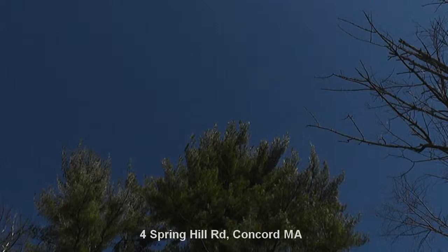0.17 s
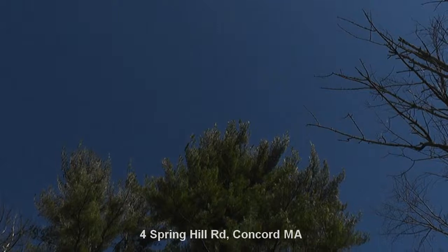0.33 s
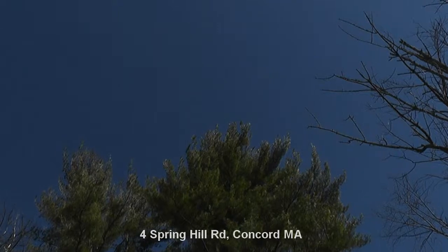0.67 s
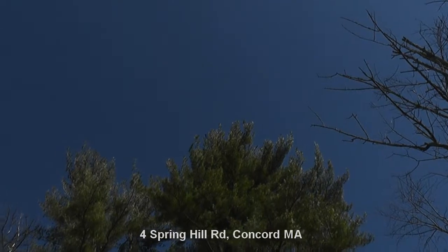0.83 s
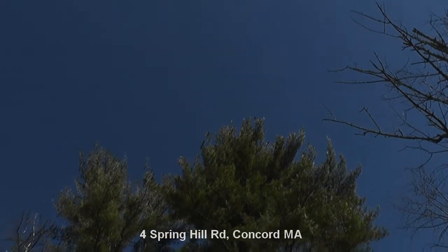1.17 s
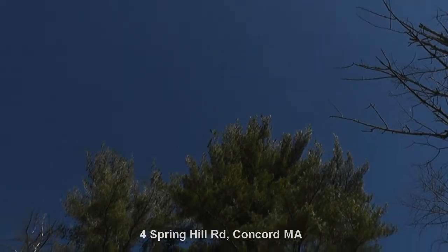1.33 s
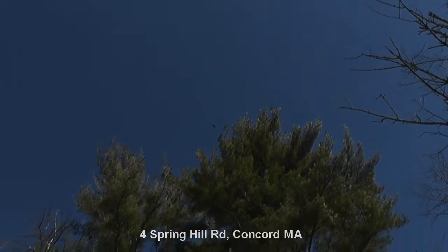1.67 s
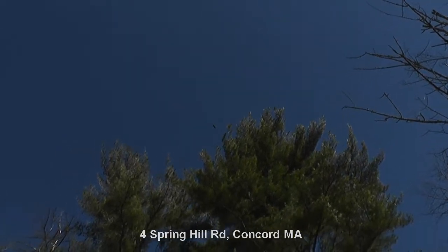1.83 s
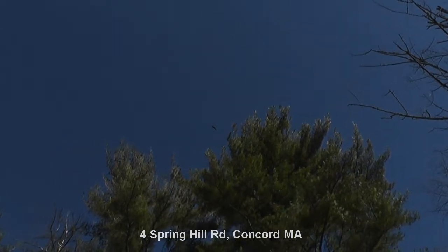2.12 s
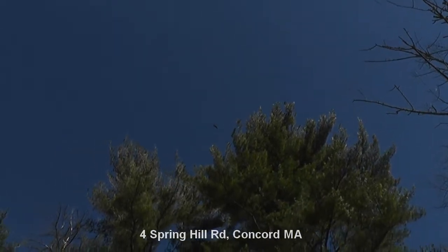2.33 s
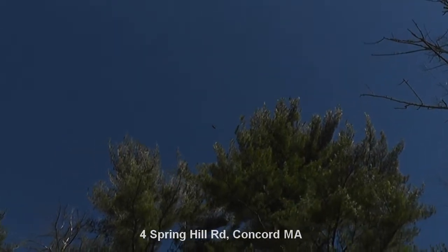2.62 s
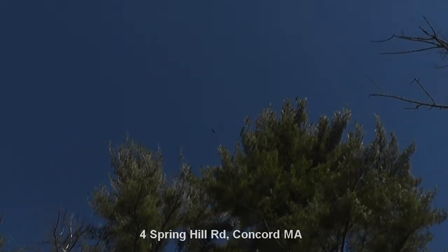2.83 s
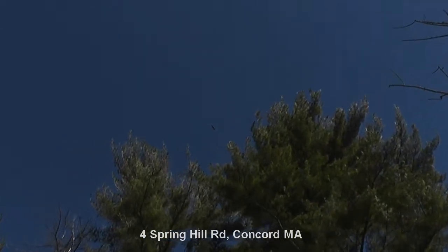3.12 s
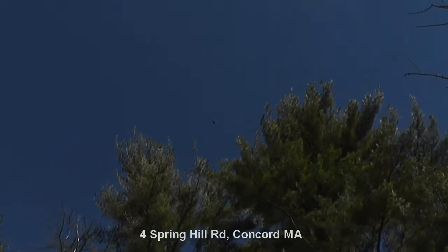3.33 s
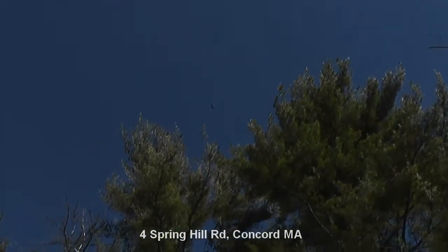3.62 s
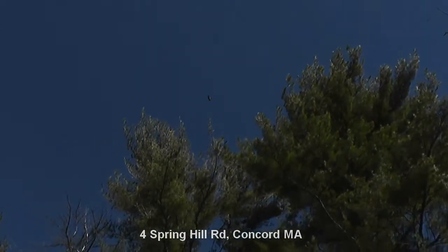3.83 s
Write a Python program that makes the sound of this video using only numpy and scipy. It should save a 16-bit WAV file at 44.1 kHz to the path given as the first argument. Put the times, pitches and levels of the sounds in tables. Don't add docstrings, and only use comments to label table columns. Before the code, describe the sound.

Hawk gives two descending screams that crack lower at the end, with birds chirping and traffic humming.

```python
import sys
import numpy as np
from scipy import signal
from scipy.fft import rfft, irfft, next_fast_len
from scipy.io import wavfile
from scipy.ndimage import uniform_filter1d

SR = 44100
rng = np.random.default_rng(int(sys.argv[2]) if len(sys.argv) > 2 else 0)


def master_out(mix):
    frames = np.transpose(np.atleast_2d(mix))
    ceiling = np.clip(frames, -1, 1)
    pcm = np.round(ceiling * 32767).astype(np.int16)
    wavfile.write(sys.argv[1], SR, pcm)


def volts_from_decibels(level):
    exponent = np.asarray(level, float) / 20
    return 10 ** exponent


N = 175959


def on_log(table, hz):
    a = np.array(table, float)
    return np.interp(np.log(np.maximum(hz, 1)), np.log(a[:, 0]), a[:, 1])


def over_time(times, values):
    return np.interp(np.arange(N) / SR, times, values)


def walk(rate_hz, size=N):
    hold = max(int(SR / rate_hz), 1)
    steps = np.repeat(rng.standard_normal(size // hold + 1), hold)
    return 0.86 * uniform_filter1d(uniform_filter1d(steps, hold), hold)[:size]


def track(rows, edge_s=0.0013):
    a = np.array(rows, float)
    t = np.arange(a[0, 0], a[-1, 0], 1 / SR)
    hz = uniform_filter1d(np.interp(t, a[:, 0], a[:, 1]), size=66, mode="nearest")
    ends = np.clip(np.minimum(t - t[0], t[-1] - t) / edge_s, 0, 1)
    return int(t[0] * SR), hz, np.sqrt(2) * ends * volts_from_decibels(np.interp(t, a[:, 0], a[:, 2]))


def running_phase(hz):
    return 2 * np.pi * np.cumsum(hz) / SR


def pan(x, db):
    return x * volts_from_decibels(np.array([[db / 2], [-db / 2]]))


WOOD_GAP_S, WOOD_WIDE = 0.0013, 0.35


def wood(x, t60_s, patchy_db):
    t = np.arange(SR) / SR
    tail = rng.standard_normal((2, SR)) * volts_from_decibels(3.9 * rng.standard_normal(SR))
    tail = tail * volts_from_decibels(-60 * t / t60_s + patchy_db * walk(44.3, size=SR))
    tail = tail * np.clip(t / WOOD_GAP_S - .5, 0, 1)
    tail = tail[0] + WOOD_WIDE * tail[1] * np.array([[1], [-1]])
    unit = tail / np.sqrt(np.mean(np.sum(tail ** 2, 1)))
    return signal.fftconvolve(x[None], unit, axes=1)[:, :N]


FLICKER_DB, SWELL_DB, LEAN_DB = 0.96, .5, -1.16
# frequency_hz, level_db
SIDE_SPECTRUM = [(30, -8), (60, -1), (110, -14.5), (200, -12.5), (500, -8.5), (2400, -9), (4400, -15.5),
                 (8000, -19), (13000, -0.5)]


def background(colour, db, low_hz, high_hz, swell):
    size = next_fast_len(N)
    f = np.arange(size // 2 + 1) * SR / size
    shape = volts_from_decibels(on_log(colour, f)) * (f >= low_hz) * (f < high_hz)
    mid, side = rfft(rng.standard_normal((2, size))) * shape
    side = side * volts_from_decibels(on_log(SIDE_SPECTRUM, f))
    half_octave = 2 * np.log2(np.maximum(f, 1))
    out = 0
    for k in range(int(2 * np.log2(low_hz)), int(2 * np.log2(high_hz)) + 2):
        mask = np.clip(1 - np.abs(half_octave - k), 0, 1)
        level = volts_from_decibels(SWELL_DB * swell + FLICKER_DB * walk(6.126))
        m, s = irfft(np.array([mid, side]) * mask, size)[:, :N] * level
        out = out + np.array([m + s, m - s])
    return pan(out * volts_from_decibels(db) / np.std(out.mean(0)), LEAN_DB)


# frequency_hz, level_db (per Hz)
RUMBLE_SPECTRUM = [(18, -77), (30, -36.5), (96, -8.5), (209, -1.5), (710, -16), (794, -18), (855, -19),
                   (1760, -24.5), (2500, -30), (3250, -66), (5500, -120)]
# time_s, level_db
PASSING_SWELL = [(0, 1.5), (.9, -1), (1.45, 0), (2.2, 0.5), (2.9, 1), (3.2, -0.5), (3.3, -0.5), (4, 0.5)]


def traffic(swell):
    rumble = background(RUMBLE_SPECTRUM, -34.5, 20., 2500., swell)
    return rumble * volts_from_decibels(over_time(*np.array(PASSING_SWELL).T))


# frequency_hz, level_db (per Hz)
HISS_SPECTRUM = [(1470, -34), (2500, 2), (3720, -3.5), (4270, -8.5), (5490, -13), (6340, -15), (7010, -20),
                 (10200, -22), (15500, -31.5)]
# time_s, level_db
BREEZE_SWELL = [(0, 1.5), (1.4, -1.5), (1.6, -2.5), (2.7, 0), (2.9, 0.5), (4, -0.5)]


def hiss(swell):
    wind = background(HISS_SPECTRUM, -56, 2500., 16000., swell)
    return wind * volts_from_decibels(over_time(*np.array(BREEZE_SWELL).T))


DRONE_HZ, DRONE_WIDTH_HZ = 252.7, 81
# time_s, level_db
DRONE_SWELL = [(0, -52), (.55, -48), (.75, -39.5), (1.0, -39.5), (1.45, -43), (1.7, -42.5), (2.5, -49.5),
               (2.95, -37), (3.2, -34.5), (3.3, -48.5), (4, -46)]


def drone():
    edges_hz = [DRONE_HZ - DRONE_WIDTH_HZ / 2, DRONE_HZ + DRONE_WIDTH_HZ / 2]
    band = signal.butter(2, edges_hz, "band", fs=SR, output="sos")
    x = signal.sosfilt(band, rng.standard_normal(N))
    return pan(x / np.std(x) * volts_from_decibels(over_time(*np.array(DRONE_SWELL).T)), -2.2)


THROB_HZ = 132.8
# start_s, length_s, level_db
ENGINE_LUMPS = [(.2, 0.14, -39), (.375, 0.046, -32), (.44, 0.072, -37.5), (.485, 0.065, -33.5),
                (0.649, 0.056, -33.5)]


def throb():
    out = np.zeros(N)
    for s, length, db in ENGINE_LUMPS:
        i, n = int(s * SR), int(length * SR)
        tone = np.sin(2 * np.pi * THROB_HZ * np.arange(n) / SR)
        out[i:i + n] += volts_from_decibels(db) * 2 * np.hanning(n) * tone
    return out


RUSTLE_RISE = 0.29
# start_s, length_s, level_db, centre_hz
DRY_TICKS = [(0.159, 0.066, -53, 5860), (0.592, .09, -65, 8000), (0.676, 0.1, -63.5, 10100),
             (.85, 0.0081, -64, 10990), (1.017, 0.091, -66, 11000), (1.261, 0.079, -63, 9000),
             (1.352, 0.14, -63.5, 11000), (2.253, 0.011, -53, 6900), (2.282, .035, -56, 5960),
             (3.108, 0.0083, -67, 9000), (3.372, 0.0067, -57, 7140), (3.503, 0.0063, -62, 8000),
             (3.693, .03, -63, 4800), (3.709, 0.096, -55, 8400), (3.734, .03, -52, 6200),
             (3.835, .03, -60, 4600), (3.947, 0.0078, -64, 9000)]


def rustles():
    out = np.zeros((2, N))
    for s, length, db, hz in DRY_TICKS:
        grit = rng.standard_normal((2, 6000)) * volts_from_decibels(3.5 * rng.standard_normal(6000))
        edges_hz = [hz * 0.38, min(hz * 1.21, 15000)]
        band = signal.butter(3, edges_hz, "band", fs=SR, output="sos")
        grit = signal.sosfilt(band, grit[0] + 0.21 * grit)
        i, n = int(s * SR), min(int(length * SR), 6000)
        shape = np.interp(np.arange(n) / n, [0, RUSTLE_RISE, 1], [0, 1.4, 0])
        out[:, i:i + n] += volts_from_decibels(db + 1.8 * walk(160, size=SR)[:n]) * grit[:, :n] * shape / np.std(grit)
    return out


LEAVES_S, LEAVES_DB = .008, -9


def foliage(x):
    taps = np.zeros(int(LEAVES_S * SR) + 2)
    places = (rng.random(6) * (len(taps) - 1)).astype(int)
    np.add.at(taps, places, volts_from_decibels(LEAVES_DB) * rng.standard_normal(6) / 2)
    taps[0] = 1
    return signal.fftconvolve(x, taps[None], axes=1)[:, :N]


BUZZ_RATE_HZ = 90
# time_s, pitch_share, level_db
BUZZ_SHAPE = [(0, .97, -2), (.04, 1.0, -5), (.14, 1.01, -12)]
# start_s, centre_hz, sweep_share, level_db
BUZZ_CALLS = [(1.74, 9100, 0.0852, -68), (1.885, 8330, 0.0854, -65.5)]


def buzzes(wet):
    for s, hz, sweep, db in BUZZ_CALLS:
        _, share, gain = track(BUZZ_SHAPE, 0.0083)
        i, t = int(s * SR), np.arange(len(share)) / SR
        trill = sweep * np.sin(2 * np.pi * BUZZ_RATE_HZ * t + 1.0 * walk(60, size=SR)[:len(t)])
        wet[i:i + len(t)] += volts_from_decibels(db) * gain * np.sin(running_phase(hz * (share + trill)))


OVERTONE_HZ, OVERTONE_LOW, OVERTONE_PAN_DB = 4900, .3, -4
THIRD_DB = -29
SLAP_S, SLAP_DB, BIRD_T60_S, BIRD_PATCHY_DB = 0.015, 0, 0.41, 1.5
# time_s, pitch_hz, level_db
CHIRRUP_SHAPE = [(0, 3596, -17), (.018, 3980, -5.5), (.038, 4055, 3), (.042, 4400, -2), (.047, 3000, -11),
                 (.054, 3100, -16), (.061, 3680, -1), (.08, 3150, -6), (.09, 2980, -9)]
TSEEP_SHAPE = [(0, 3500, -7), (.009, 5050, 3), (.015, 5750, -1), (.021, 3900, -12), (.034, 3720, -2),
               (.048, 3100, -5), (.072, 2750, -13), (.097, 3790, -7), (.116, 3150, -12)]
CHIP_SHAPE = [(0, 2800, -26), (.004, 4110, -2.5), (.006, 4870, -20), (.008, 5665, -7.5), (.02, 5860, -2.5),
              (.03, 5670, -3.5), (.04, 4954, -18), (.042, 3930, -20), (.048, 2980, -7)]
SEET_SHAPE = [(0, 8310, 1), (.09, 8220, -1), (.15, 8250, 1), (.19, 8870, 4)]
RISE_SHAPE = [(0, 7300, -15), (.04, 7900, 11), (.06, 8200, -6)]
# start_s, level_db, second_harmonic_db, echo_db, left_right_db
CHIRRUP_CALLS = [
    (0.396, -43, -30, -13, 1.5),
    (1.303, -43, -30, -12, 1),
    (2.646, -65, -30, 1, 2),
    (3.19, -44.5, -30, -10, 0),
]
TSEEP_CALLS = [
    (.194, -43, -24, -12, 0),
    (3.746, -42, -22, -10, 0),
]
CHIP_CALLS = [
    (2.253, -31.5, -9.5, -6, -2.5),
]
SEET_CALLS = [
    (1.59, -78.5, -30, 2, 0),
]
RISE_CALLS = [
    (1.125, -73, -31, -11, 0),
]


def birds():
    dry, wet = np.zeros((2, N)), np.zeros(N)
    kinds = [  # contour, calls, tremble_db, pitch waver share
        (CHIRRUP_SHAPE, CHIRRUP_CALLS, 3, .012),
        (TSEEP_SHAPE, TSEEP_CALLS, 4, .03),
        (CHIP_SHAPE, CHIP_CALLS, .7, .002),
        (SEET_SHAPE, SEET_CALLS, 4, .006),
        (RISE_SHAPE, RISE_CALLS, 4, .012)]
    for shape, calls, tremble_db, waver in kinds:
        for s, db, second_db, echo_db, pan_db in calls:
            _, hz, gain = track(shape, 0.00055)
            i, n = int(s * SR), len(hz)
            phase = running_phase(hz * (1 + waver * walk(400, size=SR)[:n]))
            gain = volts_from_decibels(db + tremble_db * walk(229, size=SR)[:n]) * gain
            whistle = np.sin(phase)
            opening = np.clip((hz / OVERTONE_HZ - 1) / 0.036, OVERTONE_LOW, 1)
            overtones = volts_from_decibels(second_db) * opening * np.sin(2 * phase)
            if shape is CHIP_SHAPE:
                overtones = overtones * np.linspace(0, 2, n) ** 2.0
            if shape is TSEEP_SHAPE:
                overtones = overtones + volts_from_decibels(THIRD_DB) * np.sin(3 * phase) * (hz < OVERTONE_HZ)
            dry[:, i:i + n] += gain * (pan(whistle, pan_db) + pan(overtones, pan_db + OVERTONE_PAN_DB))
            wet[i:i + n] += volts_from_decibels(echo_db) * gain * (whistle + overtones)
    buzzes(wet)
    slap = volts_from_decibels(SLAP_DB) * np.roll(wet, int(SLAP_S * SR)) * np.array([[1], [.4]])
    return foliage(dry) + slap + wood(wet, BIRD_T60_S, BIRD_PATCHY_DB)


RUNUP_S, RUNUP_SHARE, RUNUP_DB, RUNUP_DULL_DB = .026, .7, -10, -26
JITTER, SHIMMER_DB, BREAK_SHIMMER_DB = 0.0026, 1.3, 1.2
HOARSE_DB, AIR_DB = -30, 5.5
SIXTH_DB, BREAK_TILT_DB = -25.5, -5
HAWK_ECHO_DB, HAWK_PAN_DB, ECHO_TOP_HZ, WOOD_T60_S, WOOD_PATCHY_DB = -8, -1, 3530, 1, 5.5
# time_s, pitch_hz, level_db, sixth_harmonic_db
FIRST_SCREAM = [(0.18, 1278, -44.5, -57.5), (0.24, 1296, -37, -55), (0.29, 1274, -46, -54),
                (0.324, 1223, -35.5, -57), (0.356, 1230, -40.5, -56), (0.388, 1206, -45.5, -61),
                (0.52, 1160, -35.5, -59), (0.592, 1118, -44, -71), (0.612, 1046, -44, -80)]
SECOND_SCREAM = [(1.06, 1225, -47.5, -55), (1.1, 1244, -38, -58), (1.164, 1229, -34.5, -54),
                 (1.224, 1183, -34, -58.5), (1.3, 1154, -33, -58), (1.35, 1150, -36.5, -60.5),
                 (1.385, 1145, -34.5, -62.5), (1.47, 1112, -41.5, -63), (1.515, 1049, -40, -66)]
# time_s, pitch_hz, level_db, brightness_db
FIRST_BREAK = [(.606, 905, -43, -12), (.635, 862, -47, -4), (.665, 840, -50, 3), (.682, 824, -44, 0),
               (.7, 785, -45, 2), (0.715, 690, -47, -1)]
SECOND_BREAK = [(1.512, 885, -42, -14), (1.54, 838, -46, -12), (1.575, 805, -46, -3), (1.6, 775, -53, 4),
                (1.625, 750, -54, 5), (1.64, 730, -60, 0)]
# frequency_hz, level_db
THROAT_RESPONSE = [(1080, -36), (1200, -9.5), (2350, 4), (3600, -15.5), (5800, -26), (7200, -26),
                   (10800, -45.5), (14000, -50)]
BREAK_HARMONICS = [-16, -5, 0, -8, -25, -27]


def hawk():
    out = np.zeros(N)
    for scream, tail in ((FIRST_SCREAM, FIRST_BREAK), (SECOND_SCREAM, SECOND_BREAK)):
        a = np.array(scream)
        s, hz, db = a[0, :3]
        upper = [(s - RUNUP_S, hz * RUNUP_SHARE, db + RUNUP_DB)] + list(a[:, :3])
        bright = a[:, 3] - a[:, 2] - SIXTH_DB
        boost = over_time(np.r_[s - RUNUP_S / 4, a[:, 0]], np.r_[bright[0] + RUNUP_DULL_DB, bright])
        opening = over_time(*np.array(tail)[:, [0, 3]].T)
        for rows, broken, shimmer_db in ((upper, False, SHIMMER_DB), (tail, True, BREAK_SHIMMER_DB)):
            i, pitch, gain = track(rows)
            n = len(pitch)
            phase = running_phase(pitch * (1 + JITTER * walk(116.2, size=SR)[:n]))
            gain = gain * volts_from_decibels(shimmer_db * walk(68.3, size=SR)[:n])
            for k in range(1, 14):
                twinkle = walk(36, size=SR)[:n] - .6
                hoarse = 1 + volts_from_decibels(HOARSE_DB) * k * walk(900, size=SR)[:n]
                if broken:
                    level_db = BREAK_HARMONICS[min(k, 6) - 1] + BREAK_TILT_DB * max(k - 6, 0)
                    level_db = level_db + opening[i:i + n] * (k > 3)
                else:
                    level_db = on_log(THROAT_RESPONSE, k * pitch) + boost[i:i + n] * (k > 2)
                level_db = level_db + AIR_DB * min(max(k - 2, 0), 3) / 3 * twinkle
                out[i:i + n] += gain * volts_from_decibels(level_db) * hoarse * np.sin(k * phase + k * k)
    dull = signal.sosfilt(signal.butter(2, ECHO_TOP_HZ, fs=SR, output="sos"), out)
    return pan(out + volts_from_decibels(HAWK_ECHO_DB) * wood(dull, WOOD_T60_S, WOOD_PATCHY_DB), HAWK_PAN_DB)


def scene():
    swell = walk(1.5)
    ambience = traffic(swell) + hiss(swell) + drone() + throb()
    return ambience + rustles() + birds() + hawk()


def roll_off(x):
    return signal.sosfilt(signal.butter(12, 15660, fs=SR, output="sos"), x)


START_S, FADE_S, TOP_HZ = .134, .024, 15600


def record(dry):
    fade = np.clip((np.arange(N) / SR - START_S) / FADE_S, 0, 1)
    low_pass = signal.ellip(8, .2, 60, TOP_HZ, fs=SR, output="sos")
    mix = signal.sosfilt(low_pass, dry * fade)
    return roll_off(mix)


dry = scene()
out = record(dry)
master_out(out)
```